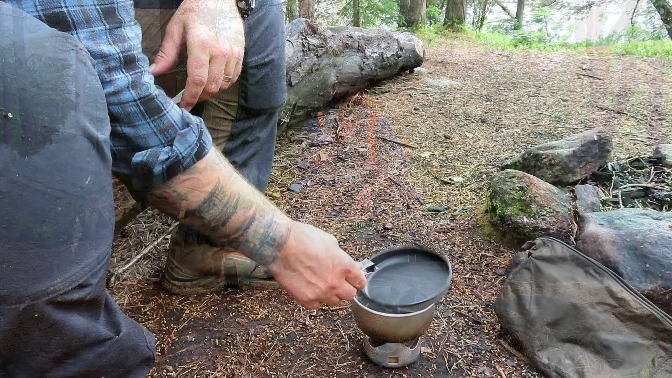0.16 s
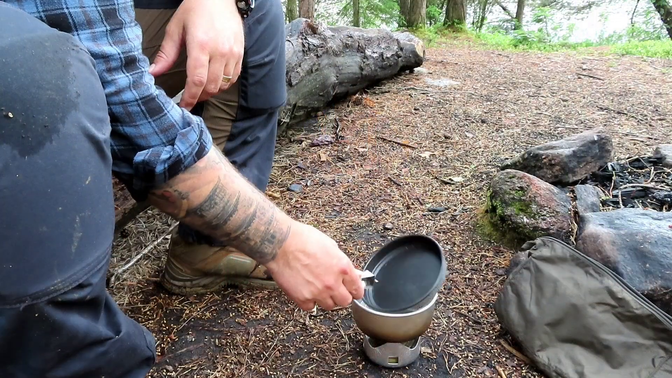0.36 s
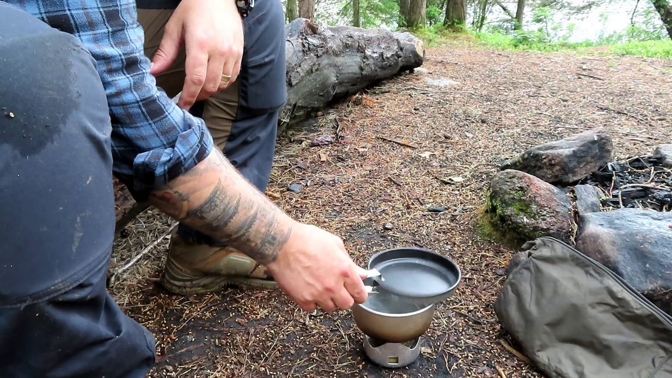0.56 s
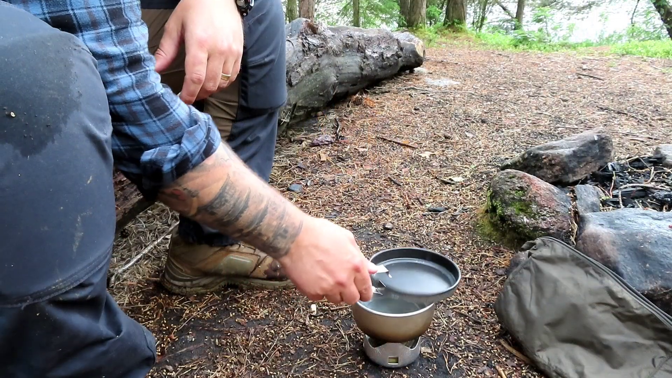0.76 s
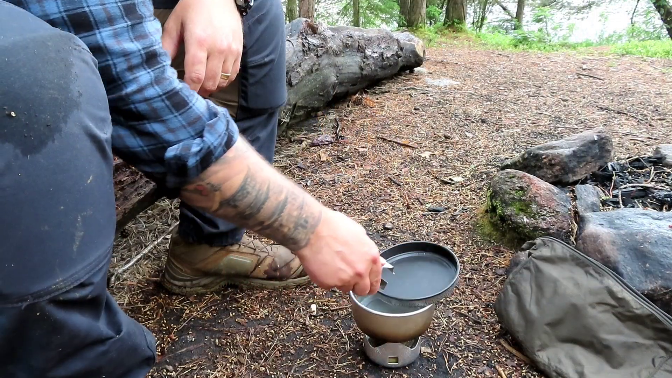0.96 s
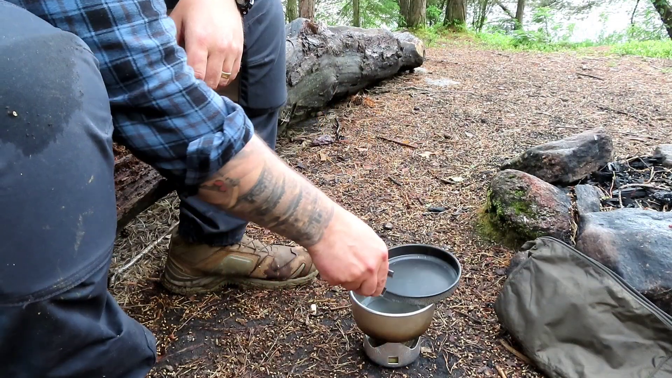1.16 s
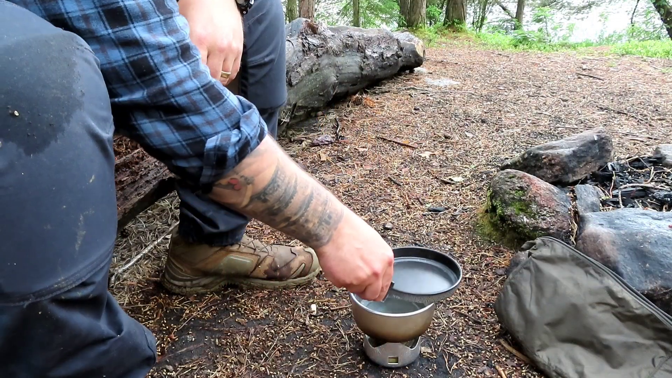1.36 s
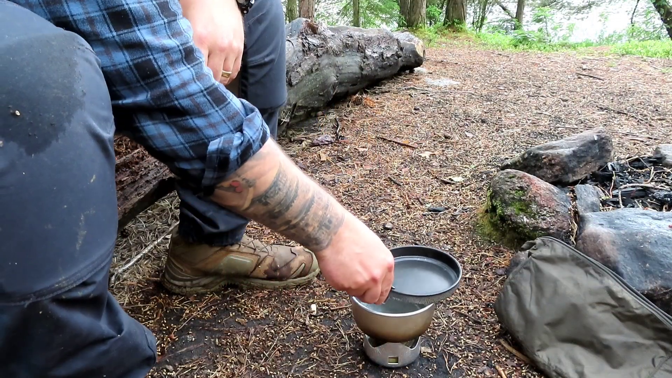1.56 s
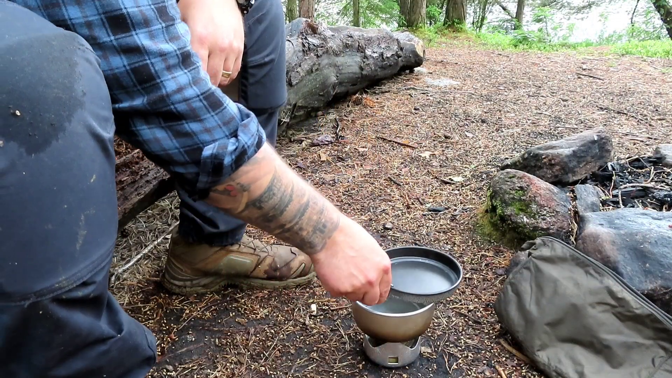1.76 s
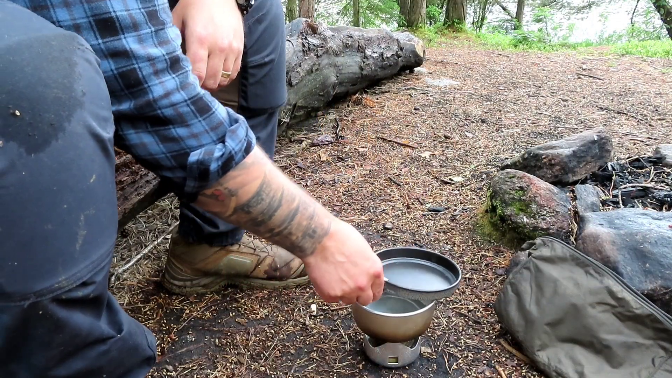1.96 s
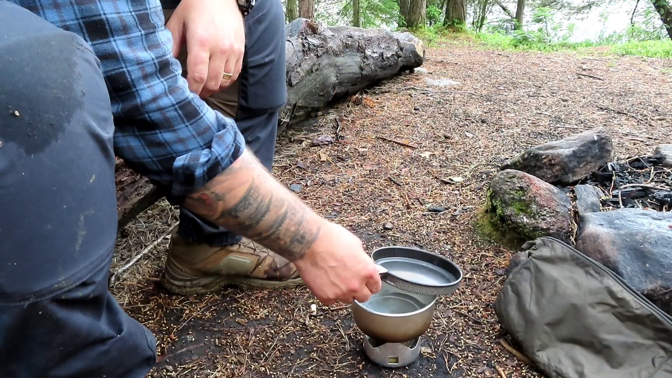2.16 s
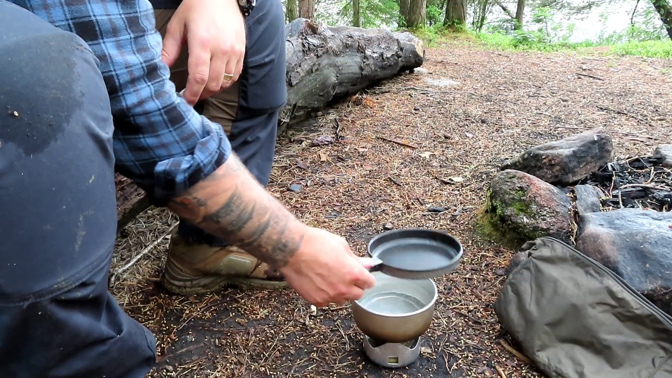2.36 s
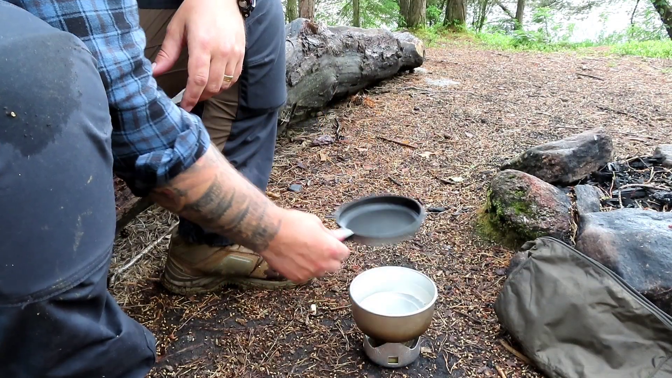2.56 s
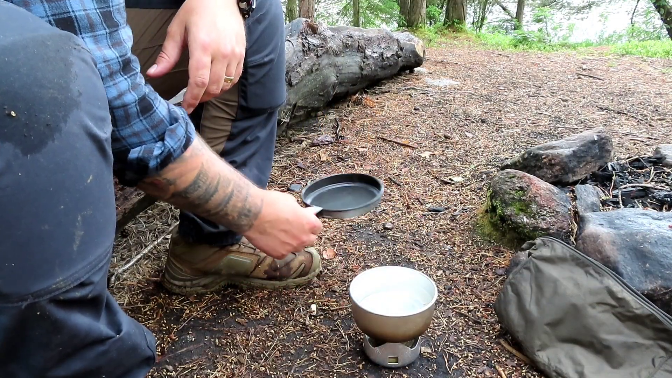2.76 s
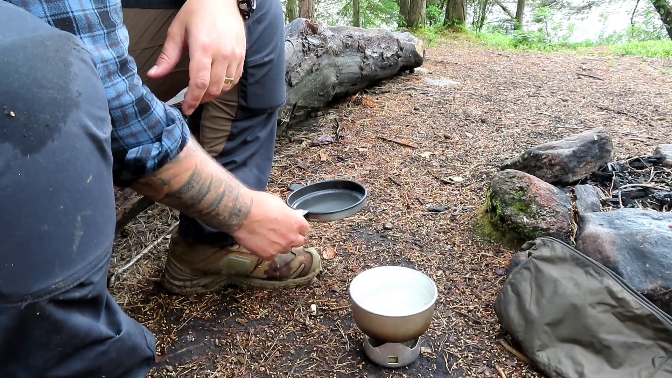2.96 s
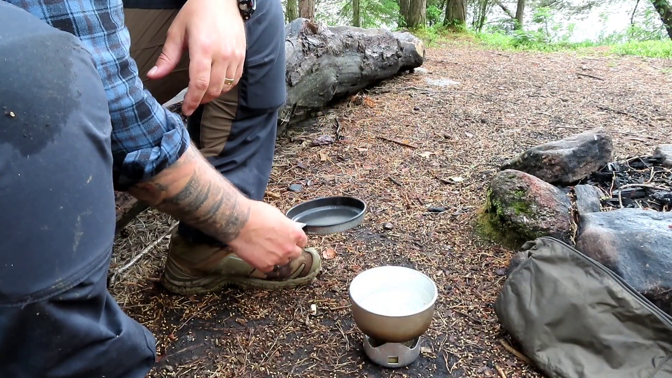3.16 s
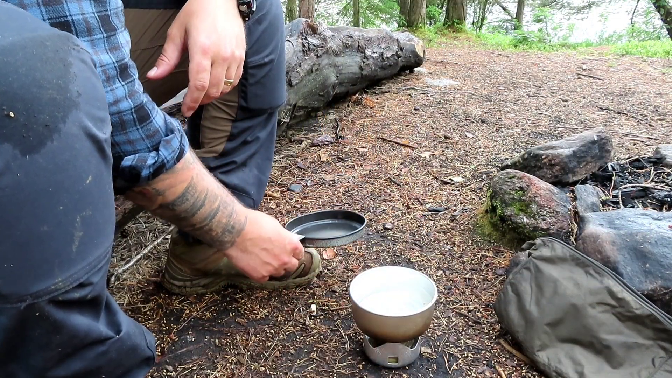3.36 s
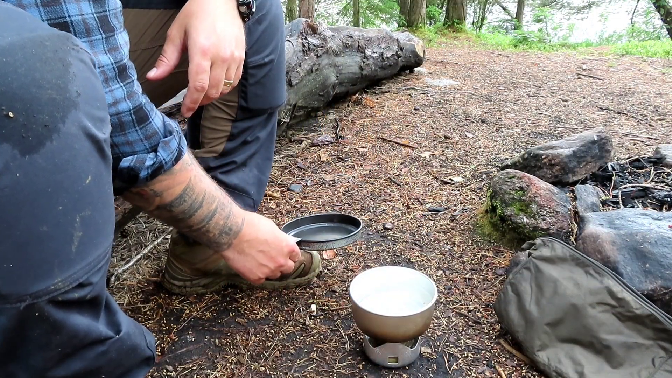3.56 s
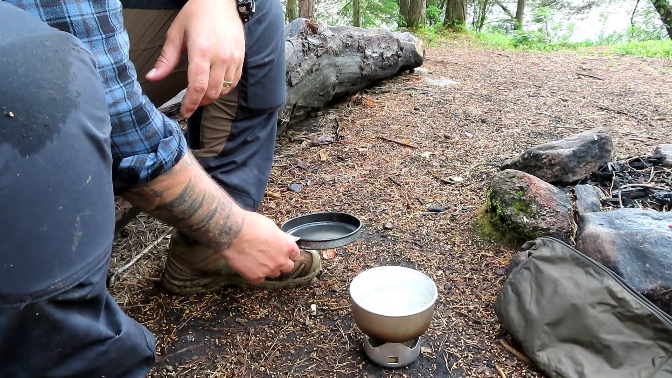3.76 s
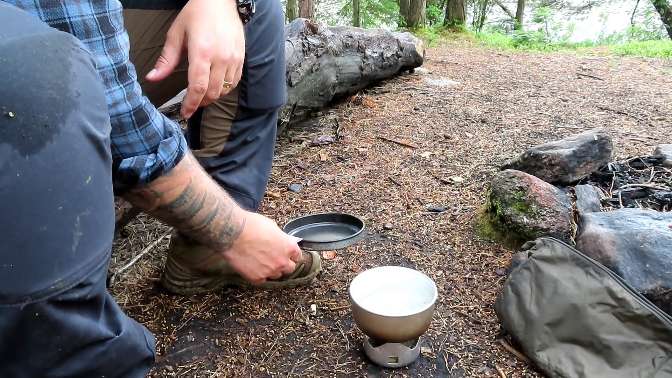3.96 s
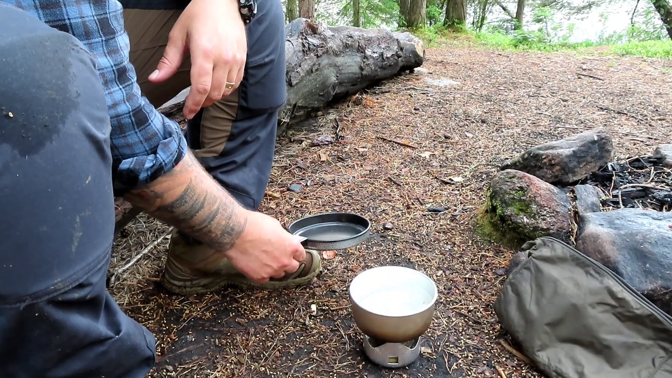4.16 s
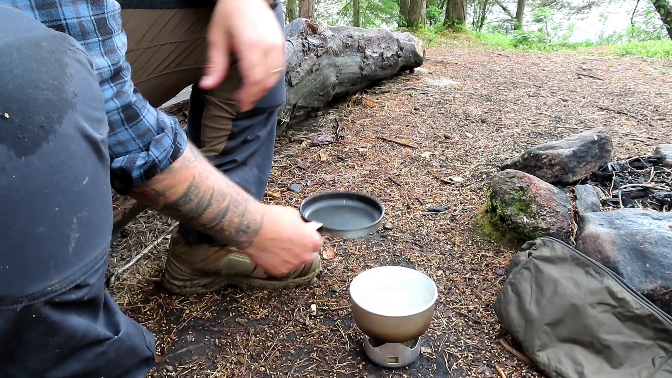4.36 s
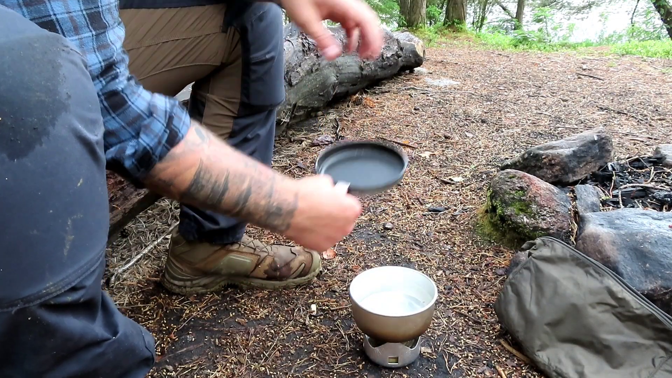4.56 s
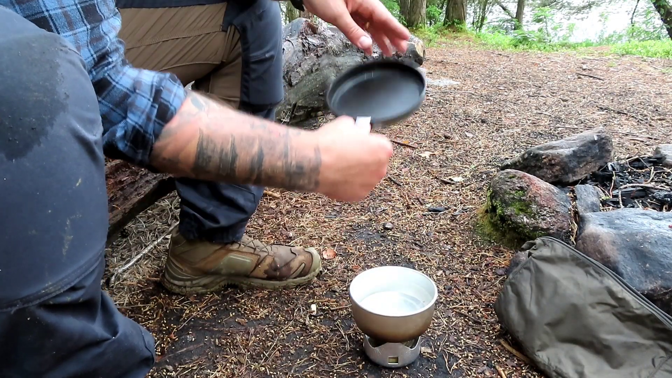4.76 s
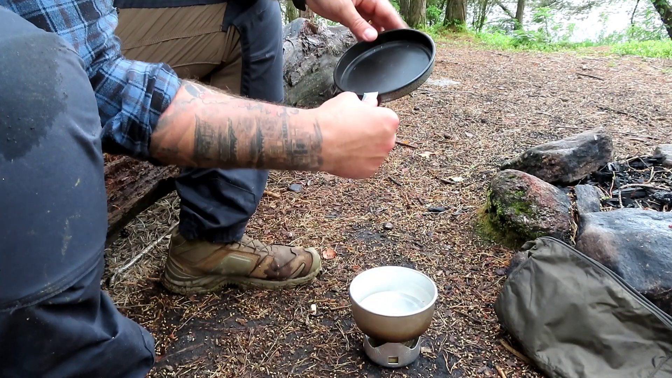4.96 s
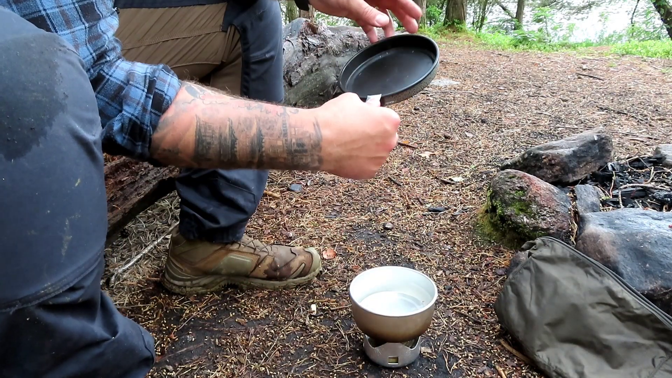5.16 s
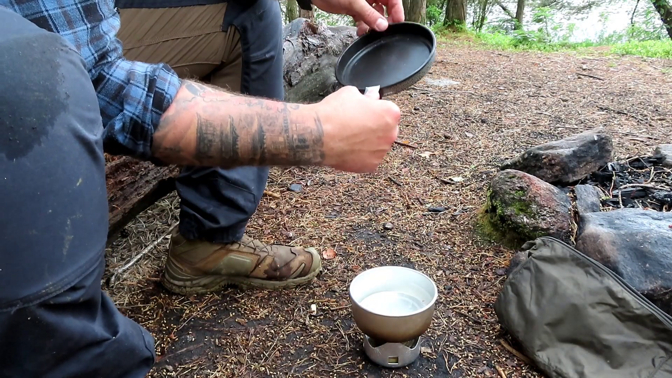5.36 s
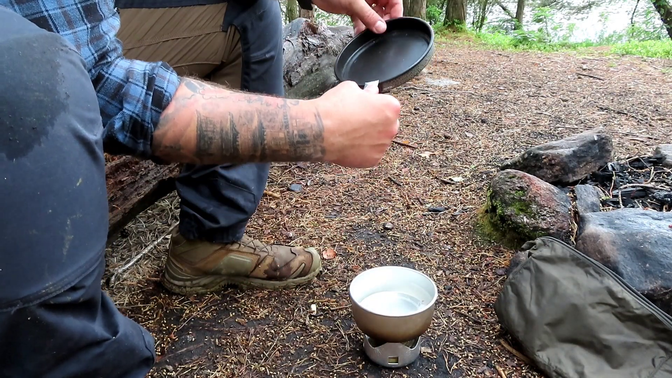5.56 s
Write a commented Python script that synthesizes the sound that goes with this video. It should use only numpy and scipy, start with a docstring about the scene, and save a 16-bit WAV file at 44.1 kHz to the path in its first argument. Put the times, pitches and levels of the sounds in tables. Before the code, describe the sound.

A smooth, low woodland hush fades in slightly and stays beneath everything. From 0.14 to 0.3 s a small pan lands on a metal stove bowl in a fast, bright cluster of clanks. The hardest single knocks come at 0.5 s, with a brief singing rub of the rim until 0.65 s and another sharp clank. From 0.7 to 1.85 s knocks are spaced and gradually softer, some preceded by tiny rising scrapes; rings are short, under half a second, quickly damped. From 1.95 to 2.2 s gripper jaws rattle in a dozen quiet, dry, choked clacks. Then just hush. At 3.1 to 3.75 s comes one extremely thin, very high wavering whistle, barely audible; from 3.8 to 4.9 s a few faint distant bird notes glide, blurred by trees. Around 4.6 s a sleeve swishes softly, swelling and dying away. Close stereo microphone, metal a touch right, open air.

```python
"""A steady woodland hush fades in, and a small frying pan in a pot gripper lands on a camp stove's metal bowl.
Nudged about, it clanks, scrapes and once sings: struck modes over sheet-metal noise, and rubbed modes.
As the gripper takes its weight to lift it off, the jaws rattle in dry clacks over the choked pan's modes.
Then a thin high whistle and a few far birds, gliding sines blurred by the trees' echo;
among the last notes a sleeve swishes: shaped noise that swells and dies away."""
import sys
import numpy as np
from scipy import signal
from scipy.fft import rfft, irfft, next_fast_len
from scipy.io import wavfile

SR = 44100
rng = np.random.default_rng(int(sys.argv[2]) if len(sys.argv) > 2 else 0)


def transcribe(u):
    """Save the signal u as a 16-bit wav file named by the first command-line argument.

    u: samples, shape (n,) or (channels, n), limited to [-1, 1]; the rate is SR.
    q: integer samples, one column per channel.
    """
    v = np.clip(np.atleast_2d(u).T, -1, 1)
    q = np.round(v * 32767).astype(np.int16)
    wavfile.write(sys.argv[1], SR, q)


N = 247842
T = np.arange(N) / SR  # s
AGE = T[:SR // 2]  # time since a blow, s

# Pan against bowl. Each row: start in seconds, strength in dB, hardness of the contact in dB,
# how freely both ring in dB, pitch favoured by the contact point in Hz, chatter in seconds.
KNOCKS = [ (0.1419, -32.5, 5.5, -4.5, 655, 0), (.1775, -45, 22, 8, 660, .007),
          (0.1879, -22, 27, -0.5, 2780, 0.00056), (0.2133, -12.5, 10.5, -4, 1150, 0.011),
          (.2274, -11, 5, -3.5, 1470, 0.0011), (0.2358, -18.5, 6, 6.5, 2020, 0.022),
          (.2700, -21, 5, 6, 2450, 0.033), (0.5031, -8.5, -1, -2.5, 1980, 0.00052),
          (.5200, -10, 1, -7, 780, 0.018), (0.6466, -14, 6, 0.5, 7600, 0),
          (.6830, -22.5, -11, 1, 2380, 0.023), (0.7936, -22, -7.5, 0, 1600, 0.018),
          (0.835, -21, -9.5, -3.5, 3241, 0.0061), (.9335, -21.5, -3, 1, 877, .007),
          (0.9407, -17.5, -5, 1.5, 2070, .005), (1.1229, -21, -8, -10.5, 1900, .008),
          (1.1961, -36.5, -7, -4.5, 2000, 0), (1.2059, -18, 0, -0.5, 1191, 0.0011),
          (1.3391, -40.5, 11, 3, 6615, 0.0014), (1.3850, -24, -8, -10, 822, 0.02),
          (1.4476, -34.5, -4, 4, 1750, 0.0053), (1.5683, -37.5, 9.5, -2, 1901, 0.006),
          (1.5914, -30, 7.5, -5, 1848, 0.0016), (1.6100, -32.5, 2.5, -0.5, 1948, 0.018),
          (1.8302, -37.5, -1, -7.5, 1192, 0.0019)]
# Gripper jaws slipping on the pan wall. Each row: start in seconds, strength in dB, hardness in dB,
# favoured pitch in Hz.
SLIPS = [ (1.9454, -24.5, 1.5, 800), (1.9565, -30, 5.5, 2140), (1.9623, -30.5, 9, 2120),
         (1.9759, -30.5, 6, 1480), (1.9940, -27.5, 9, 730), (2.0088, -31.5, 6, 1110),
         (2.032, -24, 8.5, 1880), (2.0545, -28, 11, 5400), (2.1136, -31.5, 14, 8000),
         (2.1494, -38.5, -2, 1560), (2.191, -38, 10.5, 2120), (2.2180, -39.5, 8, 2100)]
# Rim sliding on rim, harder and harder until it catches. Each row: start in seconds, length in seconds,
# level of the rub at its end in dB, before dulling.
SCRAPES = [(0.471, .028, -36), (0.631, .017, -28), (0.811, .026, -27), (1.10, 0.03, -35),
           (1.159, .037, -41), (1.368, .035, -37.5), (1.432, 0.015, -35), (1.661, .028, -40)]
# Crowded, quickly damped modes of thin sheet metal, under the knocks and under the slips.
# Each row: frequency in Hz, relative level in dB.
CLANK_SPECTRUM = [(100, -34), (300, -7), (500, -6), (780, -0.5), (1030, -0.5), (1400, 3.5), (2100, -2),
                  (2500, 0.5), (3200, -2.5), (3600, -12), (5000, -27), (6300, -16.5), (10500, -18.5),
                  (13000, -30), (16000, -40)]
CLACK_SPECTRUM = [(100, -10), (300, -6), (470, 8.5), (580, -7), (780, 5.5), (1080, -6), (1450, -2),
                  (2100, 1), (2350, -2.5), (3200, -5.5), (4000, -21), (6000, -22), (11000, -22.5),
                  (16000, -37)]
# Modes of the stove bowl. One entry per mode: pitch in Hz, level in dB, ring time (t60) in seconds
# before the pan settles on it.
BOWL_HZ = [622, 654, 1171, 1795, 2216, 2380, 2684, 2828, 2864, 3186, 3774, 4232, 4275, 4642, 5010, 5546,
           5703, 5870, 6785, 7354, 7570, 8515, 8750, 9865, 10215, 11430, 12360]
BOWL_DB = [-1.5, -2, -2, -1, -1.5, -20.5, -7.5, -8, -3, -5.5, -14, -34, -19, -32.5, -22, -14.5, -15, -33,
           -30, -37.5, -37, -21, -27, -25.5, -26.5, -27, -42]
BOWL_T60 = [0.21, 0.27, 0.4, 0.41, 0.18, 0.06, 0.55, 0.2, 0.19, 0.29, 0.39, 0.2, 0.28, 0.37, 0.25, 0.08,
            0.22, .18, 0.13, 0.13, 0.051, 0.13, 0.14, 0.12, 0.18, 0.13, 0.033]
# Modes of the pan hanging free. One entry per mode: pitch in Hz, level in dB, ring time (t60) in seconds
# before the hand damps it.
PAN_HZ = [478, 664, 785, 940, 1142, 1511, 1787, 1965, 2041, 2147, 2394, 2553, 2780, 3140, 3225]
PAN_DB = [-13.5, -1.5, -47, -17.5, -6, -8, -4.5, -7, 7.5, 0.5, -10.5, -21.5, -20.5, -17.5, -17]
PAN_T60 = [0.4, 0.22, 0.066, 0.13, 0.43, 0.41, 0.29, 0.4, 0.17, 0.04, 0.083, .13, 0.19, .16, .18]
# Modes of the pan while the jaws clamp its wall. Each row: pitch in Hz, level in dB, t60 in seconds,
# which the slips shorten a little.
CLAMPED_MODES = [(465, -4.5, 0.099), (769, -0.5, 0.15), (820, -29, 0.071), (1170, -10, 0.4),
                 (1452, -4, 0.1), (1855, -12, .06), (1980, -20, 0.061), (2135, -2.5, 0.069),
                 (2760, -15, 0.072), (3250, -17.5, 0.16), (5220, -20.5, 0.046), (5720, -24, 0.073),
                 (6630, -15.5, 0.018), (8100, -25, 0.049)]
# One thin, high whistle. Each row: time in seconds, pitch in Hz.
WHISTLE = [(3.12, 10336), (3.136, 10753), (3.162, 11021), (3.208, 10505), (3.334, 11863), (3.372, 11517),
           (3.698, 10783), (3.75, 10296)]
# Notes of far birds, each one glide. Each row: start in seconds, length in seconds, first pitch in Hz,
# last pitch in Hz, level in dB.
BIRDS = [ (3.779, 0.095, 1934, 2090, -54), (3.887, .07, 5050, 5470, -66), (3.958, 0.053, 2445, 1966, -48),
         (3.98, .09, 2840, 4210, -54), (4.05, 0.076, 3970, 3980, -65), (4.351, .07, 2800, 2800, -54),
         (4.462, 0.057, 2780, 2700, -50.5), (4.543, 0.069, 2314, 2270, -57),
         (4.668, 0.215, 2737, 2578, -47.5)]
# Rustle of the sleeve's cloth. Each row: frequency in Hz, relative level in dB.
CLOTH_SPECTRUM = [(1000, -20), (2400, 13.5), (4000, -13), (6000, -9.5), (9000, -1.5), (11500, -2.5),
                  (13500, -9), (16000, -22)]
# Woodland hush. Each row: frequency in Hz, relative level in dB per Hz.
HUSH_SPECTRUM = [(15, -43), (25, -13), (48, -1.5), (108, 1), (206, -3.5), (277, -6), (326, -8.5),
                 (695, -12.5), (775, -6), (1070, -15.5), (2110, -13.5), (5880, -31.5), (10100, -38.5),
                 (11600, -42), (16000, -49)]
# Width of the hush. Each row: frequency in Hz, side minus mid in dB.
HUSH_SIDE = [(30, -18.5), (70, -19), (140, -12), (300, 0.5), (800, -5.5), (2500, -8.5), (10000, -2)]

# what all knocks share: both rings against the strength (dB), the clank's decay,
# and the share of its ring time that the hand leaves the pan
BOWL_RING_DB, PAN_RING_DB, CLANK_T60_S, HAND_DAMPING = -10.5, -9.5, 0.055, 0.36
# a medium knock (dB), its bass (dB) and the lift of its favoured pitch (dB)
MEDIUM_DB, KNOCK_BASS_DB, SPOT_DB = -21, 0.5, 8
# lighter knocks have more of both (dB per dB)
BASS_PER_DB, SPOT_PER_DB = 0.4248, 0.1735
# time to full pressure (s), shorter with hardness (dB per dB), longer by a share of the chatter
PRESS_S, PRESS_PER_DB, PRESS_PER_CHATTER = 0.00082, 0.3, 0.087
# the pan settles on the rim at this time (s) and from then on leaves the bowl this share of its ring time
SETTLED_S, SETTLED_DAMPING = 0.9, 0.84
# a long drag of the rim makes the pan sing: start (s), end (s), level (dB)
SING_FROM_S, SING_TO_S, SING_DB = 0.527, 0.646, -29
# what all slips share (dB): the pan's ring against the strength, the bass, the lift of the favoured pitch
SLIP_RING_DB, SLIP_BASS_DB, SLIP_SPOT_DB = -6.5, -1.5, 7.5
WHISTLE_DB, HUSH_DB = -68, -46.5
# the sleeve's swish: its middle (s), spread of its bell to each side (s), level (dB)
SLEEVE_S, SLEEVE_SPREAD_S, SLEEVE_DB = 4.625, 0.17, -57.5
TOP_HZ = 16000


def knocks():
    """The pan lands and rocks on the rim; both vessels ring at every touch, and the next damps them, the pan most."""
    out = np.zeros((2, N))
    peaks = sheet(PAN_HZ + BOWL_HZ)
    bowl = list(zip(BOWL_HZ, BOWL_DB, BOWL_T60)) + overtones()
    pan = list(zip(PAN_HZ, PAN_DB, PAN_T60))
    next_touch = [row[0] for row in KNOCKS[1:]] + [SLIPS[0][0]]
    for (s, db, hard_db, free_db, spot_hz, span), until in zip(KNOCKS, next_touch):
        light_db = MEDIUM_DB - db
        bass_db = KNOCK_BASS_DB + BASS_PER_DB * light_db
        touch = (bass_db, hard_db, spot_hz, SPOT_DB + SPOT_PER_DB * light_db)
        rise = PRESS_S * undb(-PRESS_PER_DB * hard_db) + PRESS_PER_CHATTER * span
        force = undb(db) * np.minimum(AGE / rise, 1)
        bowl_life = SETTLED_DAMPING if s > SETTLED_S else 1
        bowl_ring = ring(bowl, bowl_life, touch) * choke(s + AGE - until, t60=1.5)
        pan_ring = ring(pan, HAND_DAMPING, touch) * choke(s + AGE - until, t60=0.19)
        rings = undb(BOWL_RING_DB) * bowl_ring + undb(PAN_RING_DB) * pan_ring
        add(out, s, force * undb(free_db) * rings)
        for delay, size in chatter(span):
            blow = clank(CLANK_SPECTRUM, peaks, CLANK_T60_S, touch, crack_db=-6.5, crack_t60=0.016)
            add(out, s + delay, force * size * blow)
    return out


def chatter(span, count=4, rebound=0.44, uneven=0.51):
    """A sliding rim catches a few more times: (delay s, size) of each catch, with the energy of one blow."""
    chance = rng.random((count, 2))
    if span < 1e-3:
        return [(0, 1.0)]
    delays = np.append(0, (np.arange(count) + chance[:, 0]) * span / count)
    sizes = np.append(1, rebound * (1 + uneven * (2 * chance[:, 1] - 1)))
    return list(zip(delays, sizes / np.linalg.norm(sizes)))


def overtones(count=30, low_hz=4400, high_hz=13000, db=-28, slope_db=-7, t60=0.24):
    """The bowl's many faint upper modes, unevenly spaced and weaker by the octave."""
    pitches = low_hz + (high_hz - low_hz) * (np.arange(count) + rng.random(count)) / count
    return [(hz, db + slope_db * np.log2(hz / low_hz), t60) for hz in pitches]


def ring(modes, length, touch, scatter_db=2.5, twin=0.46, split=0.008, wide_hz=22000):
    """Modes of a round vessel: each beats with a close twin; the high ones reach the two ears out of step."""
    mid, side = np.zeros((2, len(AGE)))
    chances = rng.standard_normal((len(modes), 3))
    turns = rng.random((len(modes), 2))
    for (hz, db, t60), (size, gap, lean), turn in zip(modes, chances, turns):
        phase = 2 * np.pi * (hz * AGE + turn[0])
        swing = undb(db + scatter_db * size + colour(hz, *touch)) * fade(t60 * length)
        twin_phase = phase * (1 + split * gap) + 2 * np.pi * turn[1]
        mid += swing * (np.sin(phase) + twin * np.sin(twin_phase))
        side += swing * np.cos(phase) * np.sign(lean) * hz / wide_hz
    return stereo(mid, side)


def clank(spectrum, peaks, t60, touch, crack_db, crack_t60, split_hz=4200, treble_life=1.0,
          low_side=0.024, high_side=0.37):
    """The crowded modes of a sheet: a crack at contact, then a short wash whose treble dies first."""
    def sheet_db(hz):
        return colour(hz, *touch) + at_hz(peaks, hz)

    x = np.array([shaped(noise(spectrum, len(AGE)), sheet_db) for _ in range(2)])
    low = signal.sosfiltfilt(signal.butter(3, split_hz, fs=SR, output="sos"), x)
    high = x - low
    crack = undb(crack_db) * fade(crack_t60)
    low_wash = stereo(low[0], low_side * low[1]) * (fade(t60) + crack / 2)
    high_wash = stereo(high[0], high_side * high[1]) * (fade(t60 * treble_life) + crack)
    return low_wash + high_wash


def sheet(main_hz, spacing_hz=70, depth_db=5, from_hz=4000, lift_db=7, width_hz=30, gap_db=-3):
    """A sheet's colour, kept for every blow: peaks at its main modes, random peaks and gaps above; (Hz, dB)."""
    hz = np.arange(10, 20000, 10.)
    main = np.max(1 / (1 + ((hz[:, None] - np.array(main_hz)) / width_hz) ** 2), axis=1)
    depth = depth_db / (1 + (from_hz / hz) ** 4)
    draws = np.clip(rng.standard_normal(len(hz)), -2, 2)
    chance = np.interp(hz / spacing_hz, np.arange(len(hz)), draws)
    crowded = depth * chance - depth ** 2 * np.log(10) / 20  # offset roughly keeps the mean power
    return np.column_stack([hz, gap_db + lift_db * main + crowded])


def colour(hz, bass_db, treble_db, spot_hz, spot_db, bass_hz=950, treble_hz=3900, spot_octaves=0.16):
    """Flat blows favour low modes, hard edges high ones, the contact point those that move most there; dB."""
    hz = np.maximum(hz, 1)
    spot = np.exp(-0.5 * (np.log2(hz / spot_hz) / spot_octaves) ** 2)
    bass = bass_db / (1 + (hz / bass_hz) ** 4)
    treble = treble_db / (1 + (treble_hz / hz) ** 4)
    return bass + treble + spot_db * spot


def fade(t60):
    """Exponential decay after a blow."""
    return np.exp(-np.log(1000) * AGE / max(t60, 1e-3))


def choke(age_s, t60):
    """Gain of a ring that a new touch damps, age_s after that touch."""
    return np.exp(-np.log(1000) * np.maximum(age_s, 0) / t60)


def scrapes(build_db=12, grain_db=2.0, edge_s=0.0012, dull_hz=3500):
    """Tiny catches of the sliding rim stir the sheet's lower modes; each stroke builds up and stops."""
    force = np.zeros(N)
    for s, length, db in SCRAPES:
        to_go = np.clip((s + length - T) / length, 0, 1)
        edges = np.clip(np.minimum(T - s, s + length - T) / edge_s, 0, 1)
        force += edges * undb(db - build_db * to_go)
    rub = noise(CLANK_SPECTRUM, N) * force * undb(grain_db * walk(160))
    return stereo(signal.sosfilt(signal.butter(2, dull_hz, fs=SR, output="sos"), rub), 0)


def singing(rise_s=0.0092, spot_hz=1550, spot_db=20, bass_db=4, treble_db=-30, waver_db=2):
    """Friction feeds the pan's long-ringing modes near one pitch while the drag lasts; then they die away."""
    touch = (bass_db, treble_db, spot_hz, spot_db)
    tone = np.zeros(N)
    for hz, db, t60 in zip(PAN_HZ, PAN_DB, PAN_T60):
        level = t60 * undb(db + colour(hz, *touch) + waver_db * walk(30))
        tone += level * np.sin(2 * np.pi * hz * T)
    drag = np.clip((T - SING_FROM_S) / rise_s, 0, 1) * choke(T - SING_TO_S, t60=0.18)
    return stereo(undb(SING_DB) * drag * tone, 0)


def gripper(rise_s=0.00047, regrip_t60=0.06):
    """The jaws slip in quick dry clacks; their grip chokes the pan's ring, and each new slip cuts off the last."""
    out = np.zeros((2, N))
    clamped_hz = [mode[0] for mode in CLAMPED_MODES]
    peaks = sheet(clamped_hz, spacing_hz=169, depth_db=7, from_hz=3500, lift_db=2.5, gap_db=-2.5)
    next_slip = [row[0] for row in SLIPS[1:]] + [T[-1]]
    for (s, db, hard_db, spot_hz), until in zip(SLIPS, next_slip):
        touch = (SLIP_BASS_DB, hard_db, spot_hz, SLIP_SPOT_DB)
        blow = clank(CLACK_SPECTRUM, peaks, t60=0.061, touch=touch, crack_db=-13, crack_t60=0.0091,
                     treble_life=0.76)
        pan_ring = ring(CLAMPED_MODES, 0.98, touch) * choke(s + AGE - until, t60=regrip_t60)
        blow += undb(SLIP_RING_DB) * pan_ring
        add(out, s, undb(db) * blow * np.minimum(AGE / rise_s, 1))
    return out


def sleeve(grain_db=2.0, width=0.39, fold_s=4.67, fold_spread_s=0.12, fold_db=-54,
           fold_low_hz=1500, fold_high_hz=3100):
    """Cloth slides over cloth as the arm comes up; midway a fold gives with a lower rustle."""
    slide = stereo(noise(CLOTH_SPECTRUM, N), width * noise(CLOTH_SPECTRUM, N))
    slide = slide * undb(SLEEVE_DB) * swell(SLEEVE_S, SLEEVE_SPREAD_S)
    band = signal.butter(2, [fold_low_hz, fold_high_hz], "band", fs=SR, output="sos")
    fold = signal.sosfilt(band, rng.standard_normal(N))
    fold *= undb(fold_db) / fold.std() * swell(fold_s, fold_spread_s)
    return (slide + fold) * undb(grain_db * walk(60))


def swell(middle_s, spread_s):
    """A bell-shaped rise and fall."""
    return np.exp(-0.5 * ((T - middle_s) / spread_s) ** 2)


def birds():
    """Thin gliding whistles, blurred by the trees."""
    song = note(WHISTLE, WHISTLE_DB)
    for s, length, first_hz, last_hz, db in BIRDS:
        song += note([(s, first_hz), (s + length, last_hz)], db)
    both = stereo(song, 0)
    return both + trees(both, wet_db=-7, t60=0.45, dull_hz=6000)


def note(glide, db, quaver_hz=22, flutter_db=2, arch=0.7):
    """A whistle along (s, Hz) points that swells and fades in one arch and quavers a little."""
    hz, = at_time(glide)
    along = np.clip((T - glide[0][0]) / (glide[-1][0] - glide[0][0]), 0, 1)
    level = (4 * along * (1 - along)) ** arch * undb(db + flutter_db * walk(40))
    return level * np.sin(2 * np.pi * np.cumsum(hz + quaver_hz * walk(60)) / SR)


def trees(x, wet_db=-29, t60=0.44, dull_hz=3500, delay_s=0.0083):
    """Trunks and rocks scatter a dull echo: decaying noise that takes delay_s to build up."""
    echo = rng.standard_normal((2, len(AGE))) * fade(t60) * np.minimum(AGE / delay_s, 1) ** 2
    echo = signal.sosfilt(signal.butter(2, dull_hz, fs=SR, output="sos"), echo)
    echo /= np.sqrt(np.sum(echo[0] ** 2))
    return undb(wet_db) * signal.fftconvolve(x, echo, axes=1)[:, :N]


def woodland(start_db=-4, settle_s=0.54):
    """A smooth far hush, faded in at the start, nearly alike in both ears in the bass and wider above."""
    side = shaped(noise(HUSH_SPECTRUM, N), lambda hz: at_hz(HUSH_SIDE, hz))
    waver_db = 0.3 * walk(5)
    level_db = HUSH_DB + start_db * np.exp(-T / settle_s) + waver_db
    return stereo(noise(HUSH_SPECTRUM, N), side) * undb(level_db)


def undb(db):
    """Decibels to gain."""
    return 10 ** (np.asarray(db) / 20)


def at_hz(table, hz):
    """Read a spectrum on a log-frequency axis."""
    f, db = np.transpose(table)
    return np.interp(np.log(np.maximum(hz, 1)), np.log(f), db)


def at_time(table):
    """The columns of a curve at every sample."""
    s, *columns = np.transpose(table)
    return [np.interp(T, s, c) for c in columns]


def shaped(x, db_at):
    """Filter x by a gain in dB that depends on frequency."""
    size = next_fast_len(len(x))
    hz = np.arange(size // 2 + 1) * SR / size
    return irfft(rfft(x, size) * undb(db_at(hz)), size)[:len(x)]


def noise(table, size):
    """Noise of rms 1 with the given spectrum."""
    x = shaped(rng.standard_normal(size), lambda hz: at_hz(table, hz))
    return x / x.std()


def walk(rate, count=2000):
    """Random levels, rate a second, joined by straight lines; spread 1."""
    x = np.interp(T, np.arange(count) / rate, rng.standard_normal(count))
    return x / x.std()


def stereo(mid, side):
    """Left and right from mid and side."""
    return np.array([mid + side, mid - side])


def add(out, s, x):
    """Mix x into out from time s."""
    i = int(s * SR)
    out[:, i:i + x.shape[1]] += x[:, :N - i]


def scene():
    """Cookware close by and a touch to the right, the wood all around."""
    right_lean = undb(np.array([[-0.3], [0.3]]))
    metal = (knocks() + singing() + scrapes() + gripper()) * right_lean
    return metal + trees(metal) + woodland() + birds() + sleeve()


def record(dry):
    """Round mainly the loudest peaks, then cut the top steeply."""
    rounded = dry / (1 + dry ** 4) ** (1 / 4)
    return signal.sosfilt(signal.ellip(8, 0.2, 70, TOP_HZ, fs=SR, output="sos"), rounded)


dry = scene()
out = record(dry)
transcribe(out)
```